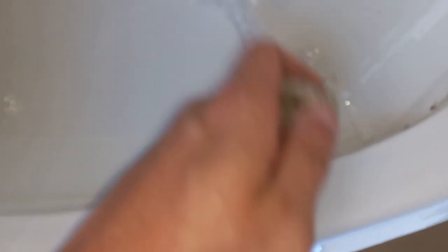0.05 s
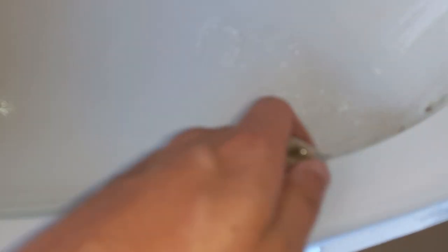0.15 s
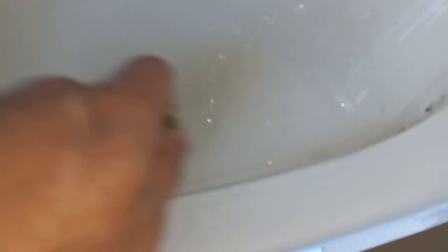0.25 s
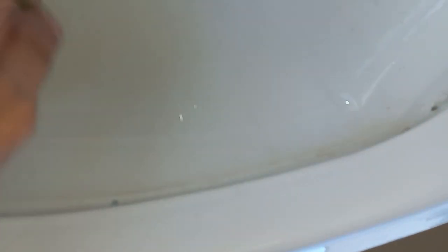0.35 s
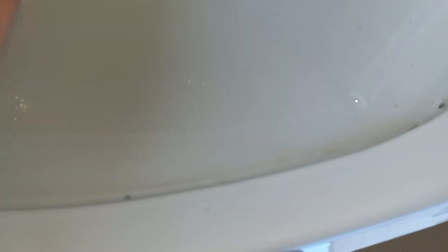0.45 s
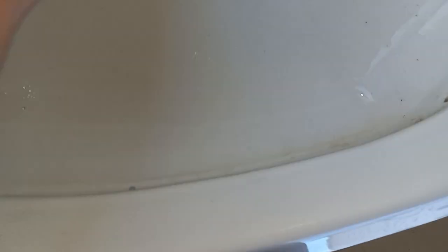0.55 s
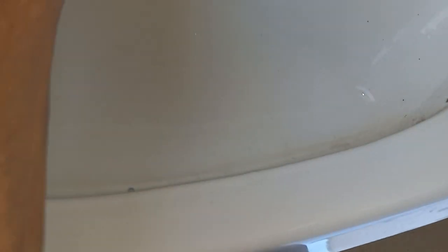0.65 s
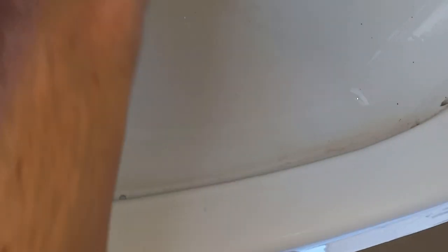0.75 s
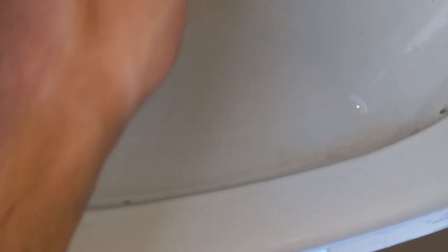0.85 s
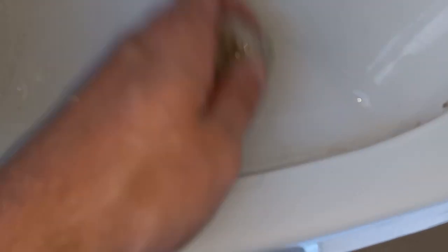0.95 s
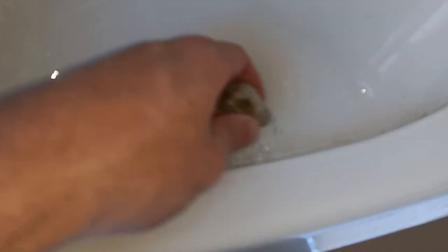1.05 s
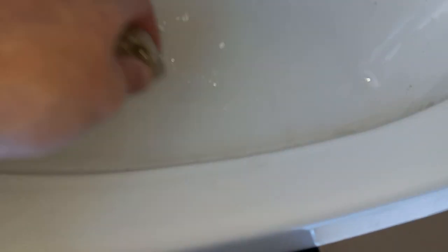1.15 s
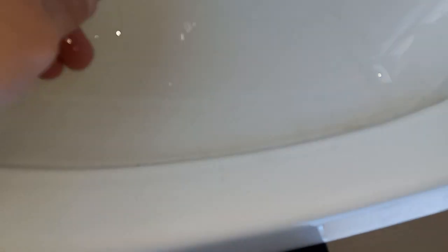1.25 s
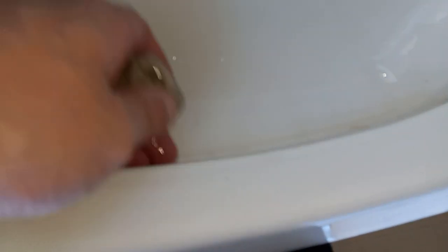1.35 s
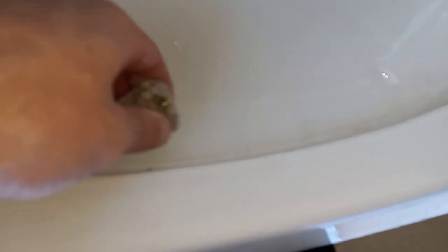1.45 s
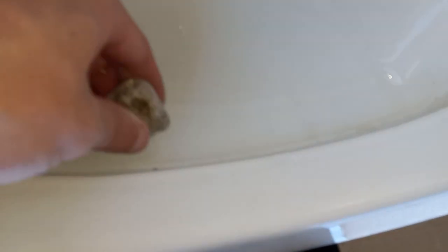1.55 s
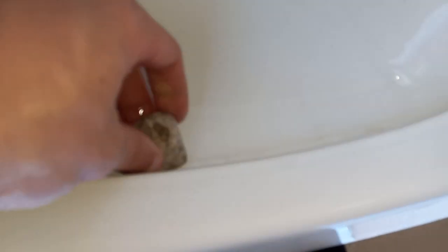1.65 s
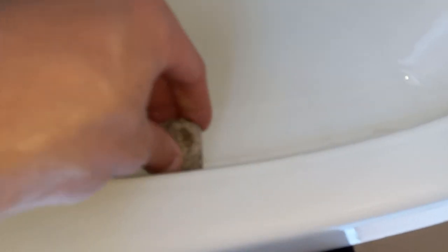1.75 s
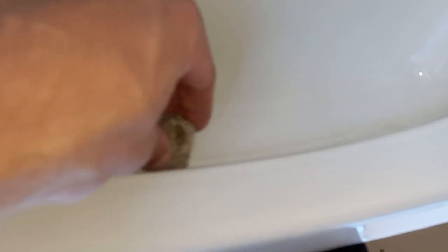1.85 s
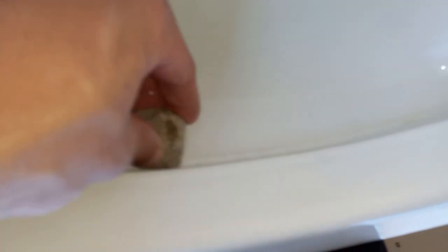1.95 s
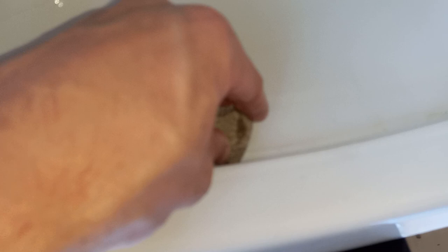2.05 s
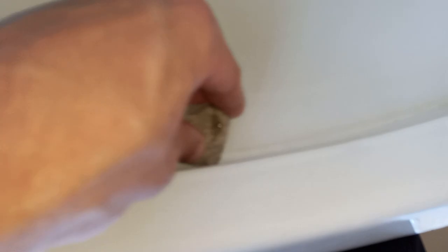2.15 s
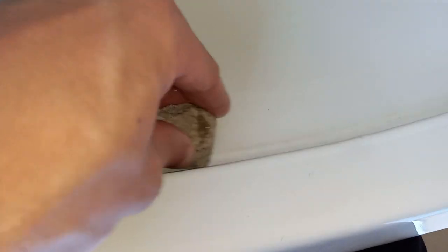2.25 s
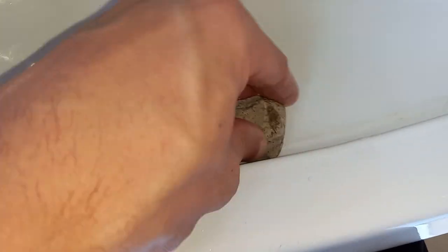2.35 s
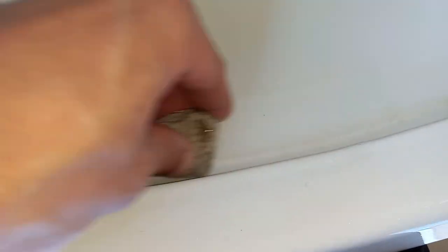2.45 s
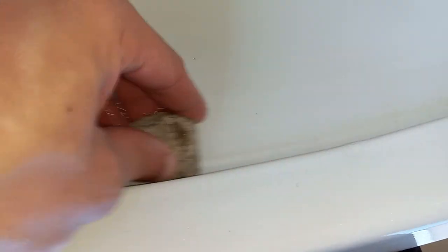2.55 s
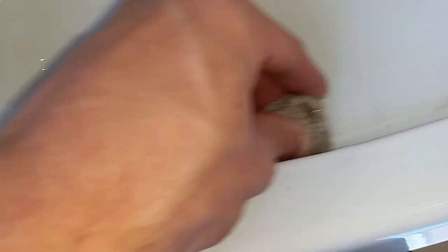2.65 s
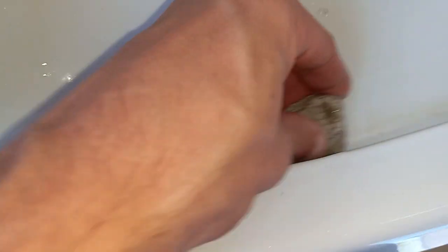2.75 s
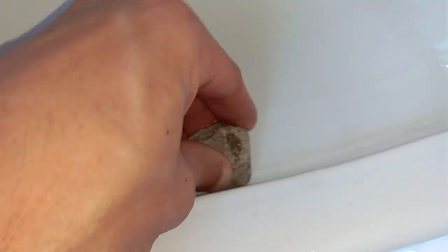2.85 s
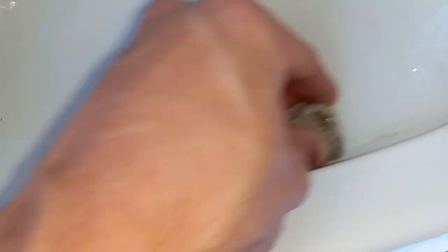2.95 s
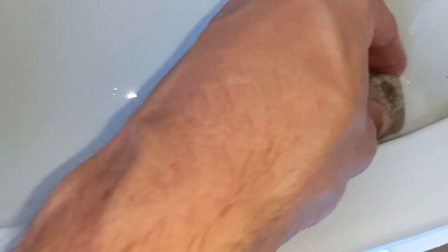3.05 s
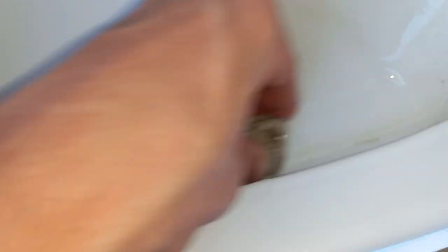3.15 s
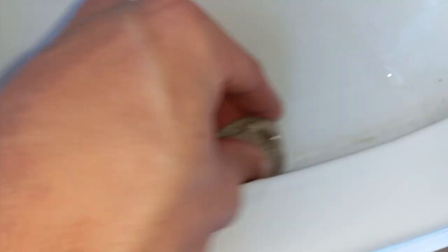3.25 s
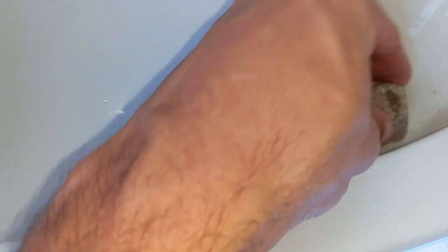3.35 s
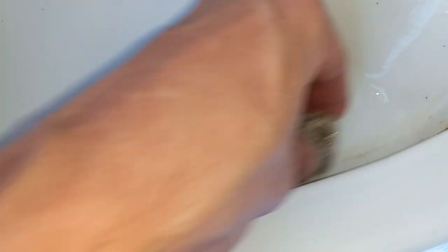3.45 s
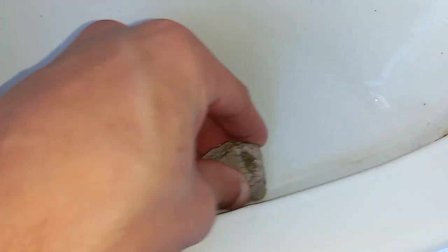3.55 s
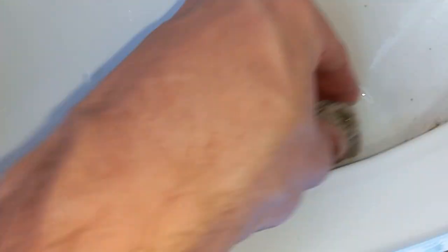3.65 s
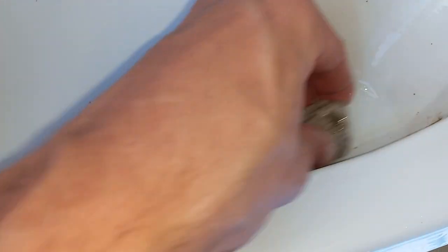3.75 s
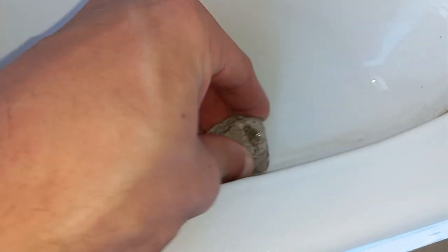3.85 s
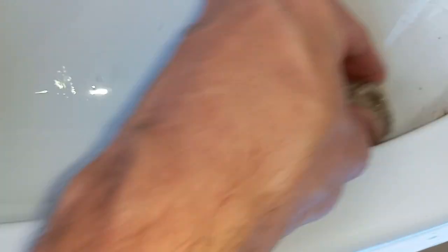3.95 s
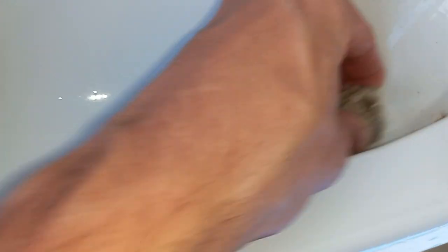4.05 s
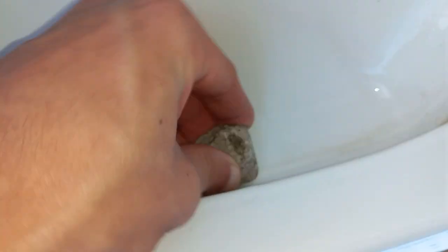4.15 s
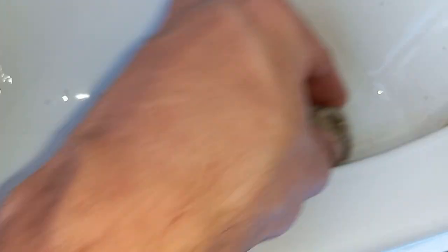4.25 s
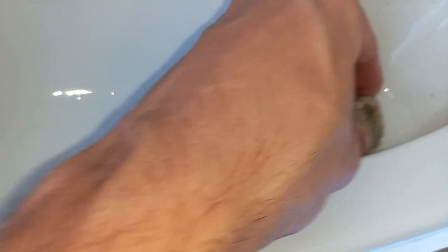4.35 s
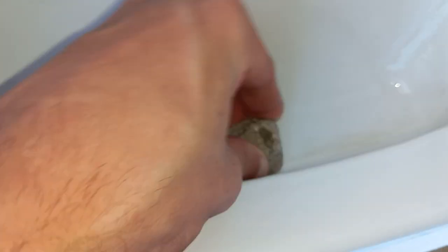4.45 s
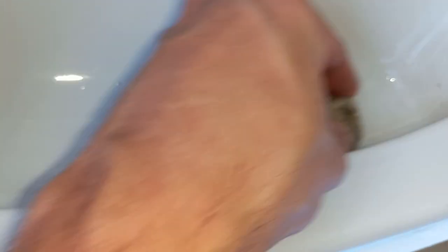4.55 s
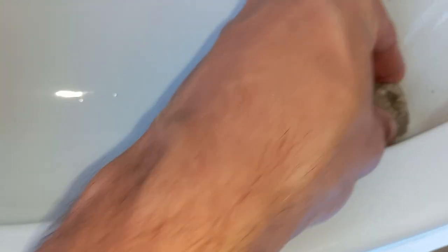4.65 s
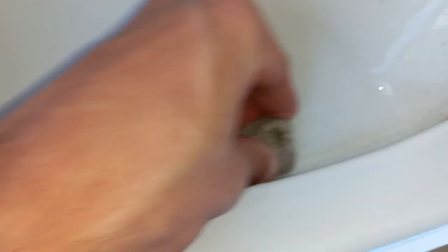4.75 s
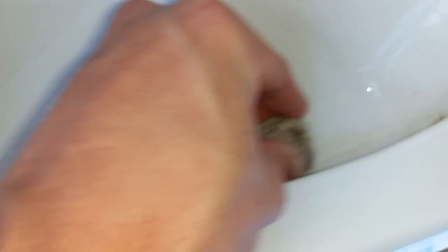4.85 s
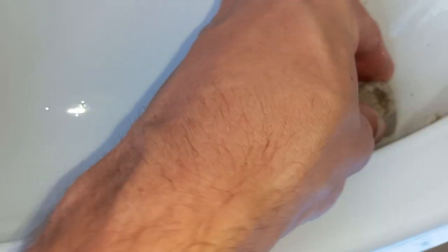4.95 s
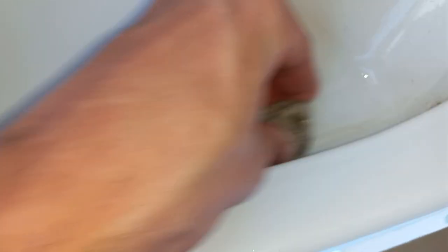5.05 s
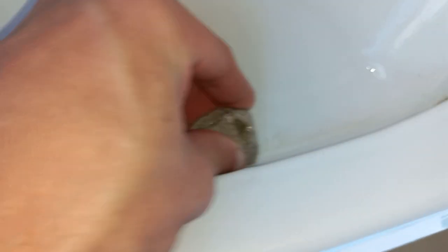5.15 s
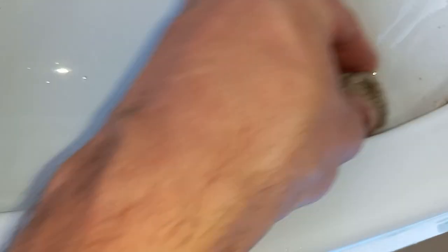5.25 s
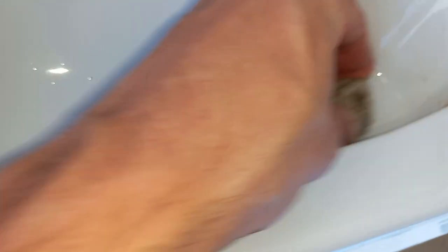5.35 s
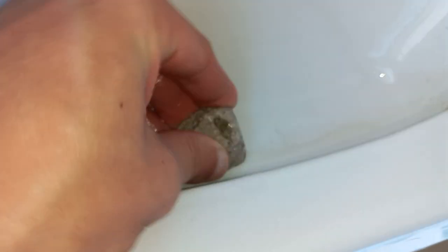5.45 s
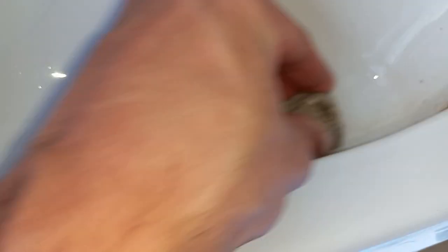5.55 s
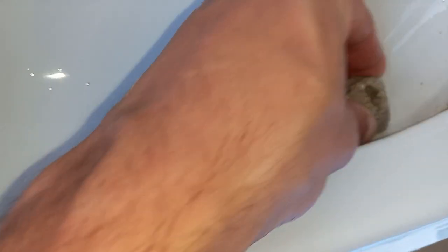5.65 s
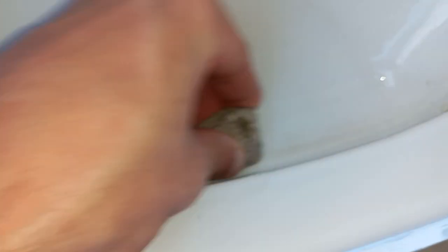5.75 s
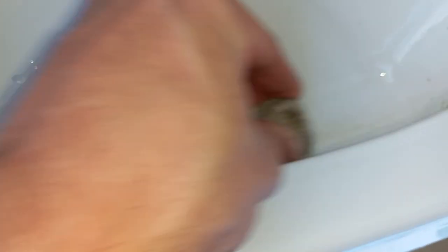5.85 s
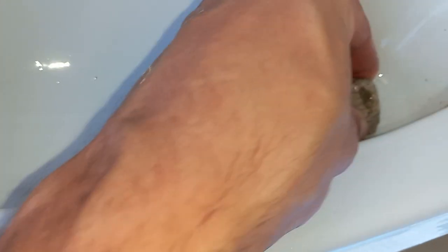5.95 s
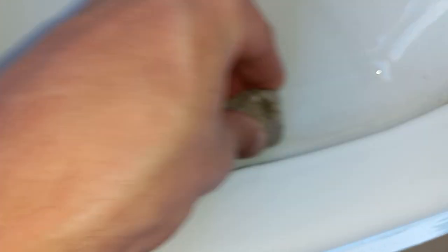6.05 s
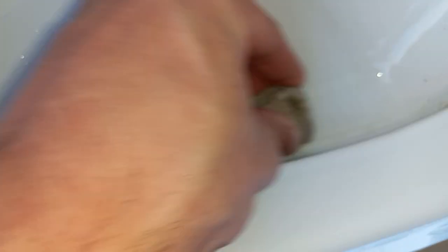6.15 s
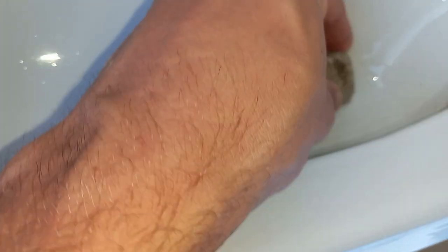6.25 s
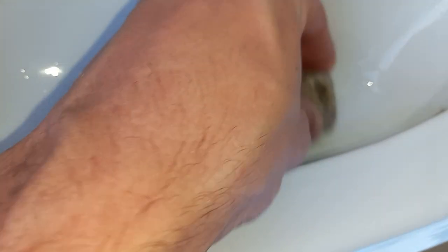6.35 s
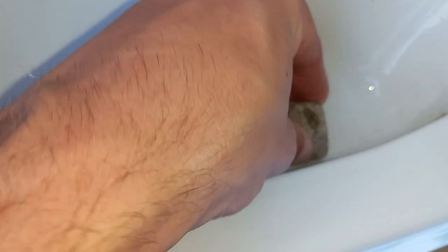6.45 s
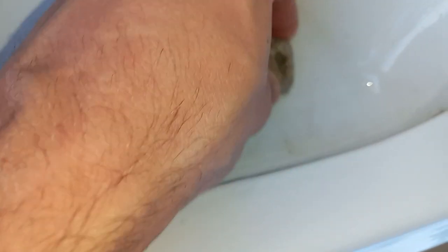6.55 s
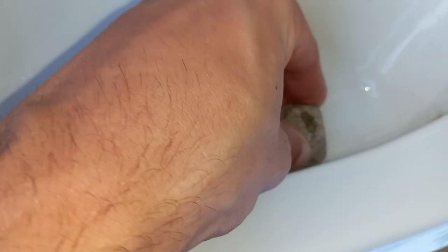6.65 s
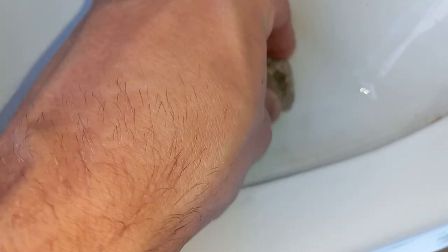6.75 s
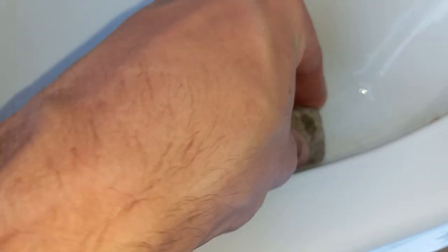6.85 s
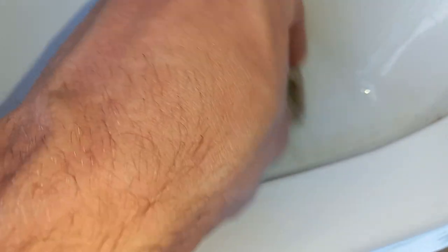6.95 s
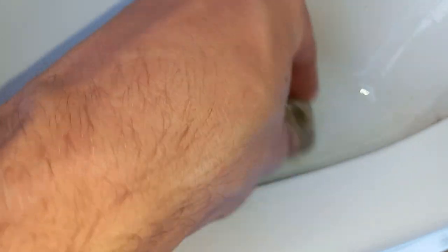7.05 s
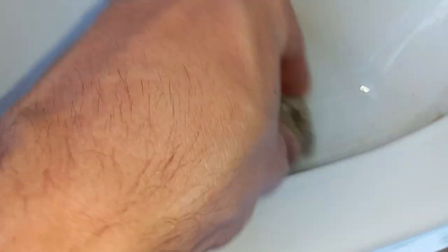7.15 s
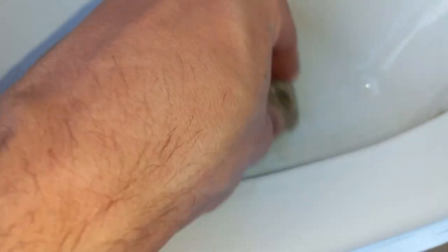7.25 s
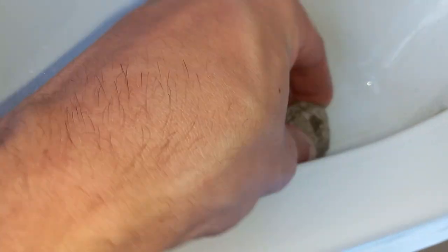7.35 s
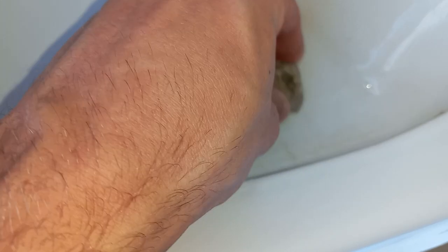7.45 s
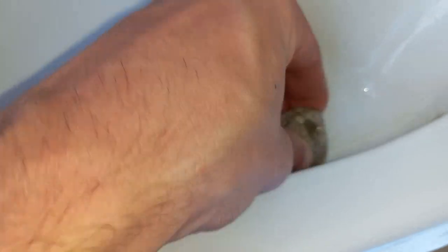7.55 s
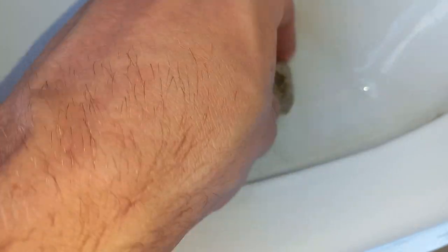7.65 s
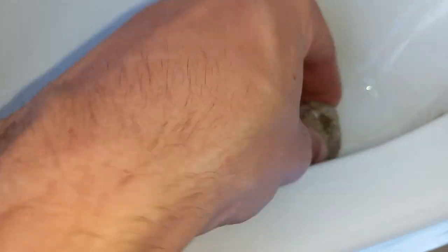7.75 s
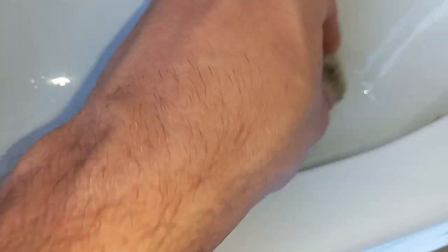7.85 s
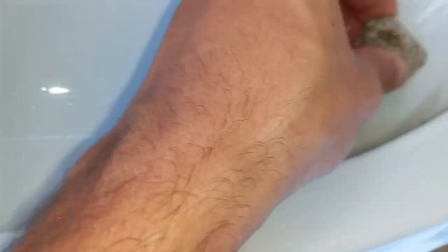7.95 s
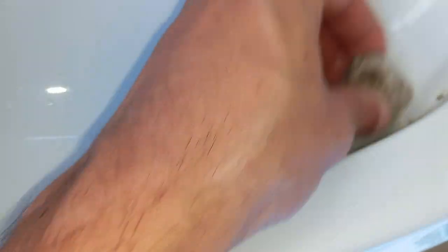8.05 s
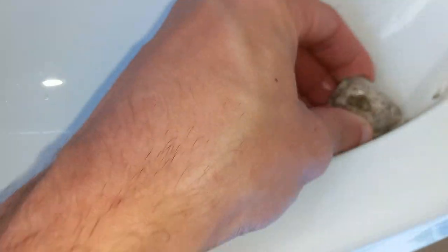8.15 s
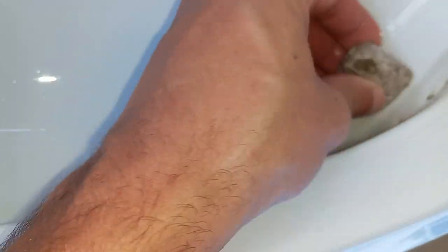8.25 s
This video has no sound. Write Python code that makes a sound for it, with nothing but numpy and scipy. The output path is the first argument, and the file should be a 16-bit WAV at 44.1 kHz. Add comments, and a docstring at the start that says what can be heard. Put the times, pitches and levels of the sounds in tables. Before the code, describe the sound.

Close up at a porcelain basin, a short splash and scattered drops, a low bump, then a denser burst of splashes as a stone is rinsed. It quiets, the stone clacks down, and light gritty rubbing begins. From three seconds the strokes are louder and coarser, with squeaks, cracks and faint porcelain ringing, until they weaken at the end. Small indoor room, stereo microphone very near.

```python
"""Close by a wet porcelain bowl, on a two-port microphone: water trickles and drops splash (bands of noise and pings)
over still air and a low boom, as a pumice stone is rinsed. At about 1.6 s it is set down with a knock.
From 1.8 s it scrubs to and fro along the rim, harder from 3 s: grit crushes at random and squeaks, knocks crack
during the strokes, the porcelain rings in dying sines. Near 8 s the strokes weaken.
Each port hears its own echoes of bowl and room."""
import sys
import numpy as np
from scipy import signal
from scipy.fft import rfft, irfft, next_fast_len
from scipy.io import wavfile

SR = 44100
rng = np.random.default_rng(int(sys.argv[2]) if len(sys.argv) > 2 else 0)


def transcribe(signal):
    """Save signal, clipped to [-1, 1], as a 16-bit WAV file at the path in sys.argv[1]."""
    frames = np.atleast_2d(signal).T
    limited = np.clip(frames, -1, 1)
    pcm = np.round(limited * 32767).astype(np.int16)
    wavfile.write(sys.argv[1], SR, pcm)


N = 365580
BLOCK = 40   # slow curves are worked out at every 40th sample

# still air at the microphone: (frequency [Hz], spectrum [dB])
AIR_SPECTRUM = [(18, -31), (30, -14), (103, 6), (252, -12), (426, -18), (1130, -23.5), (1350, -32.5),
                (8520, -76), (13300, -24), (16000, -53)]
AIR_DB = -58.5   # rms in the dry mix

# weight of the arm on the fixture: (time [s], boom level [dB])
ARM_WEIGHT = [(0.0, -60), (0.34, -46.5), (0.6, -61), (0.81, -34.5), (1.04, -49.5), (1.55, -56), (2.01, -46),
              (2.24, -40.5), (3.09, -49), (4.04, -37.5), (4.34, -46.5), (5.54, -44), (6.72, -59.5),
              (7.73, -57), (7.94, -74), (8.29, -52)]
# the hand bumps the bowl: (time [s], boom level [dB], hollow level [dB])
HAND_BUMPS = [(.005, -30.5, -50.5), (.13, -57, -51), (.53, -42.5, -53), (0.647, -32, -27),
              (0.768, -36, -30), (1.049, -67, -50), (1.3, -51, -46.5), (1.4, -54, -46.5),
              (2.601, -38.5, -33), (4.01, -26, -30), (4.61, -39, -39), (5.229, -38, -34.5)]
BUMP_RISE_S, BUMP_BOOM_DB_PER_S, BUMP_HOLLOW_DB_PER_S = 0.027, 108, 295   # rise, then fades
HOLLOW_REST_DB = -64.5
HOLLOW_LAG_S, HOLLOW_FALL_DB = 0.023, 16   # the hollow answers a swell late; its fall at one time scale

# water trickling before the stone is set down: (time [s], grit-band level [dB], fine hiss level [dB])
WATER_TRICKLE = [(0.0, -31, -39), (0.172, -58.5, -65), (0.526, -64.5, -72), (0.708, -56, -62),
                 (0.844, -55, -75), (0.908, -75, -78), (1.066, -65.5, -63), (1.462, -67, -69.5),
                 (1.63, -88, -79)]
# drops and splashes: (time [s], relative level [dB], centre [Hz], t60 [s], bell drive [dB], left-right [dB])
WATER_DROPS = [(0.021, -20, 3630, 0.027, -48, 24), (0.052, -25, 3430, 0.035, -92, -23),
               (0.119, -15.5, 3670, 0.083, -63, -9), (0.17, -31.5, 5900, 0.064, -91, -4.5),
               (0.209, -38, 3780, 0.15, -83, -9), (0.303, -34.5, 5200, 0.039, -70, 7),
               (0.354, -31, 3170, 0.03, -69, -11), (0.362, -26.5, 4650, 0.13, -82, -12),
               (.376, -31, 7100, 0.024, -75, -5), (0.4, -26.5, 1760, 0.046, -49, -17),
               (0.429, -29.5, 1230, 0.058, -66, 17), (0.451, -34, 4170, .03, -80, -5),
               (0.491, -32, 4350, 0.041, -64, -16), (0.515, -39, 2480, 0.079, -72, -10),
               (.527, -26.5, 2370, .07, -63, -15), (.54, -33, 7500, 0.023, -75, -5),
               (0.657, -16, 4200, 0.11, -69, -7), (0.673, -13, 1200, 0.048, -36, 4),
               (0.736, -7.5, 3560, 0.016, -33, -2), (0.755, -6.5, 2340, 0.088, -34, -7),
               (0.784, -5.5, 1030, 0.022, -45, 6), (.822, -19, 8500, 0.023, -58, 6),
               (0.848, -17.5, 6100, 0.027, -57, -19), (0.895, -16.5, 2440, 0.056, -51.5, -7),
               (.912, -30, 3730, 0.051, -57, 3), (0.959, -30.5, 5140, 0.029, -60, 21),
               (0.993, -28, 4650, 0.03, -62, 0), (1.021, -23, 9300, 0.016, -63, -3),
               (1.037, -12, 1915, 0.039, -85, -5), (1.215, -51, 1870, 0.02, -78, -35),
               (1.238, -39.5, 4000, 0.04, -88, -18), (1.367, -44.5, 2770, 0.28, -74, -14),
               (1.39, -40.5, 4065, 0.15, -60.5, -5), (1.471, -45, 4500, 0.035, -83, -3),
               (1.493, -45.5, 11300, 0.045, -87, -5), (1.613, -40.5, 4860, 0.099, -79, -7)]
PING_DB, PING_SHARE = -4, 0.47   # each drop's clear ping: before the shared drop level; its share of the t60
SPLASH_ON_BOWL_DB = -20   # part of the splash that strikes the porcelain
WASH_DB, WASH_DB_PER_S = -19.5, 502   # water runs off after a splash: re splash, fade
WASH_FINE_DB, FINE_DB_PER_OCTAVE = 10, 4   # its fine hiss re a stroke's; a higher splash hisses more, from 4 kHz

# upper porcelain modes: (frequency [Hz])
PORCELAIN_MODE_HZ = [1698, 2026, 2213, 2365, 2650, 2756, 3050, 3330, 3408, 3779, 4145, 4264, 4465, 4544,
                     4823, 5120, 5384, 5984, 6530, 7065]
# the same modes, row for row: (relative level [dB], t60 [s], left-right [dB], left lead [turns])
PORCELAIN_MODES = [(-13, 0.29, -10, 0.8), (-38, 0.037, 20, 0.59), (-13, 0.16, 5.5, 0.16),
                   (-11, 0.055, -24.5, 0.14), (-19, .3, 8, 0.14), (-13.5, 0.25, -1, 0.35),
                   (-14.5, 0.18, -17.5, 0.79), (-14.5, 0.096, 0, 0.039), (-7.5, 0.2, 1.5, 0.39),
                   (-8.5, 0.022, -20.5, 0.16), (-17, 0.11, -14.5, 0.24), (-8, 0.03, -15.5, 0.22),
                   (-3.5, 0.1, -8.5, 0.67), (-15.5, 0.13, 22.5, 0.34), (-35, 0.085, -20.5, 0.59),
                   (-26.5, 0.11, 1.5, 0.18), (-17.5, 0.14, 14, 0.69), (-39.5, 0.062, 3, .3),
                   (-18.5, 0.1, 17, 1), (-9, 0.11, -21, 0.21)]
# colour of the bowl's echoes at the two ports: (frequency [Hz], left-right [dB])
PORT_BALANCE = [(60, 28), (110, 13), (200, 10), (380, 10), (700, -16), (1290, 4.5), (2380, -13.5),
                (4400, -5), (8120, -2), (15000, -6.5)]
BOWL_T60_S, ROOM_T60_S = 0.026, 0.22
BELL_HZ, BELL_T60_S = 1134.9, 0.47
DRIP_MODE_HZ, DRIP_MODE_DB, DRIP_MODE_T60_S = 766, -7.5, 0.26   # a faint mode that drops strike, re bell drive
RATTLE_HZ, RATTLE_DB, RATTLE_T60_S = 666, -37, 0.051   # a dull mode that the grit shakes

# the fixture jolts on its mount: (time [s], push level [dB])
MOUNT_JOLTS = [(.66, -37), (4.04, -34), (4.66, -31), (5.62, -34), (6.412, -27), (6.644, -37), (6.84, -35),
               (7.025, -45), (7.21, -54), (7.57, -39), (7.746, -26.5), (8.105, -54)]
JOLT_HZ, JOLT_T60_S, JOLT_PUSH_S = 62, 0.098, 0.0041

# stone knocks on porcelain: (time [s], relative level [dB], centre [Hz], t60 [s], bell drive [dB], thud drive [dB])
STONE_KNOCKS = [(1.6462, -17, 2790, 0.014, -21.5, -29.5), (1.999, -31, 3050, 0.014, -46, -30.5),
                (2.057, -30, 3040, 0.14, -61.5, -57), (2.423, -44.5, 3090, 0.018, -73, -53),
                (2.5876, -32.5, 2950, 0.018, -49.5, -42), (2.8106, -22.5, 2940, 0.026, -72, -38.5),
                (3.1627, -17, 3200, 0.06, -60, -38.5), (3.3157, -16.5, 4400, 0.012, -35.5, -38),
                (3.4385, -29, 3930, 0.024, -64, -39), (3.5846, -25, 4480, 0.021, -84, -70),
                (3.8908, -27, 2400, 0.028, -51, -46), (3.9316, -27, 2460, 0.045, -39, -47),
                (4.1083, -14.5, 2120, 0.011, -37.5, -29.5), (4.298, -9.5, 2060, 0.013, -27, -29.5),
                (4.6027, -7.5, 2320, 0.0043, -41, -30), (5.101, -22, 4030, 0.084, -88, -45),
                (5.3424, -29, 2340, 0.018, -41, -36), (5.6065, -24.5, 2230, 0.014, -41.5, -60),
                (5.675, -25, 3400, 0.02, -54, -35), (5.875, -22, 4250, 0.02, -68, -33),
                (6.0224, -19, 4260, 0.03, -51, -56), (6.1942, -16.5, 3280, 0.024, -38, -54),
                (6.2727, -20, 3650, 0.02, -100, -42), (6.4078, -5.5, 4800, 0.0075, -61, -25),
                (6.469, -11.5, 3550, 0.006, -65, -32), (6.6369, -11, 4100, 0.081, -43, -28),
                (6.7118, -21.5, 3440, 0.015, -52.5, -68), (6.8349, -7.5, 4160, 0.0075, -41, -32),
                (7.018, -9.5, 4170, 0.0047, -53, -25), (7.1988, -9.5, 2460, 0.0082, -38, -29),
                (7.263, -25, 4200, 0.029, -71, -43), (7.3725, -10, 2250, 0.027, -38.5, -26.5),
                (7.426, -21.5, 2490, 0.034, -43.5, -32.5), (7.5612, -9.5, 2630, 0.047, -42, -29.5),
                (7.634, -26, 4200, 0.015, -47, -51), (7.7424, -3, 4300, 0.0055, -34.5, -26),
                (7.9974, -28, 2130, 0.013, -37.5, -63), (8.097, -11.5, 2250, 0.0097, -36.5, -32),
                (8.2147, -31.5, 2330, 0.029, -46, -69), (8.2476, -28.5, 2280, 0.014, -43, -51)]
TICK_DB, TICK_T60_S = -23.5, 0.0056   # bright edge of a knock re its level; decay
SKID_DB, SKID_DB_PER_S, SKID_FINE_DB = -12, 459, -17   # skid after a knock: re knock, fade, hiss re a stroke's
LOW_DB_PER_KHZ = -3.5   # a higher knock or splash leaves less to the low edge

# one row for each swell of grit, one or more to a stroke: (top [s], rise scale [s], fall scale [s],
# grit level [dB], low edge of the stone re grit [dB], squeak [Hz], hollow level [dB])
GRIT_SWELLS = [(1.799, 0.039, 0.017, -31.5, -9, 4350, -51.5), (1.892, 0.1, 0.065, -38.5, -4, 3880, -74),
               (2.01, 0.047, 0.059, -38, -2.5, 3010, -46), (2.068, 0.088, 0.057, -40.5, -1.5, 3270, -54),
               (2.21, 0.1, 0.024, -41, -18, 3560, -54), (2.272, 0.032, 0.03, -39.5, -13, 3090, -47),
               (2.351, 0.1, 0.06, -34.5, -1.5, 3050, -48.5), (2.46, 0.099, 0.14, -39, -29, 3250, -60),
               (2.63, 0.14, 0.17, -36, -1, 3220, -48), (2.815, 0.052, 0.096, -38, -17, 3140, -49.5),
               (3.002, 0.099, 0.082, -26.5, -3, 3960, -44.5), (3.049, 0.019, 0.021, -19, -3.5, 3750, -38),
               (3.169, 0.12, 0.082, -26, -7.5, 2240, -48), (3.348, 0.074, 0.048, -20.5, -4.5, 2140, -37),
               (3.498, 0.096, 0.04, -21, -8.5, 3840, -44.5), (3.646, 0.064, 0.093, -23, -3, 2550, -40),
               (3.827, 0.18, 0.034, -28, -5.5, 4200, -46), (3.98, 0.083, 0.052, -20, -4, 2520, -39),
               (4.07, 0.031, 0.084, -31.5, -1.5, 4300, -35.5),
               (4.138, 0.08, 0.031, -24.0, -27, 4330, -41.5), (4.29, 0.11, 0.11, -25, -4.5, 2300, -45),
               (4.42, 0.093, 0.24, -31.5, -7.5, 4460, -48.5), (4.588, 0.08, 0.069, -22.5, -3, 2380, -39.5),
               (4.78, 0.16, 0.093, -28.0, -8.5, 4460, -48), (4.926, 0.086, 0.1, -24.5, -4.5, 2520, -43.5),
               (5.115, 0.16, 0.091, -25.5, -12, 4000, -43), (5.281, 0.1, 0.031, -22, -3.5, 2520, -41.5),
               (5.389, 0.083, 0.12, -26.5, -8.5, 4370, -44.5), (5.571, 0.095, 0.12, -26, -4.5, 4740, -45),
               (5.743, 0.1, 0.077, -24.5, -8.5, 4100, -43.5), (5.892, 0.069, 0.15, -28, -6, 4460, -43.5),
               (6.074, 0.079, 0.067, -23, -7.5, 3630, -45.5), (6.192, 0.027, 0.056, -23.5, -6, 3420, -42.5),
               (6.288, 0.1, 0.031, -39.5, -59, 3900, -52), (6.392, 0.045, 0.036, -30.5, -5.5, 3600, -39.5),
               (6.508, 0.099, 0.044, -28, -12, 4070, -46.5), (6.623, 0.039, 0.048, -25, -9, 2310, -35.5),
               (6.723, 0.037, 0.028, -23.5, -20, 4090, -49.5),
               (6.813, 0.032, 0.061, -28.5, -6.5, 2500, -34.5),
               (6.923, 0.11, 0.033, -31.5, -6.5, 3700, -55), (6.988, 0.025, 0.075, -30.5, -2, 2280, -33.5),
               (7.111, 0.094, 0.066, -31, -11, 3770, -56), (7.18, 0.021, 0.052, -31.5, -4.5, 2460, -33.5),
               (7.279, 0.092, 0.059, -32.0, -9.5, 4100, -54), (7.357, 0.016, 0.039, -29, -5.5, 2500, -32),
               (7.457, 0.028, 0.038, -29.0, -17, 2510, -50.5), (7.54, 0.032, 0.072, -33.5, -4.5, 2460, -41),
               (7.643, 0.1, 0.026, -31, -8.5, 4090, -58), (7.72, 0.032, 0.094, -34.5, -6, 2350, -43),
               (7.822, 0.072, 0.039, -36.5, -3.0, 2840, -69.5),
               (8.08, 0.018, 0.066, -41.5, 0.5, 2460, -40.5), (8.224, 0.014, 0.0087, -49, 15, 2280, -51),
               (8.26, 0.041, 0.092, -41, 2, 2330, -62)]
# how the stone lies: (time [s], dull rasp re grit [dB], squeak re grit [dB], squeak width [Hz],
# fine hiss re grit [dB])
STONE_LIE = [(0, -21.5, -5.5, 494, -3.5), (.6, -7.5, -11, 500, -17.5), (1.2, -24.5, 1, 500, -9.5),
             (1.7, -26.5, -27.5, 402, -18), (2.05, -10.5, 0.5, 150, -13.5), (2.4, -10.5, 3, 295, -11),
             (2.85, -10.5, 0.5, 336, -11), (3.1, -20.5, -20, 447, -15.5), (4.5, -18.5, -28, 450, -15.5),
             (5.2, -20, -34, 454, -15.5), (6.3, -16, -3, 466, -11.5), (6.6, -31.5, -30, 400, -17),
             (7.2, -30, -16, 388, -16), (7.8, -20, 1.5, 400, -11.5), (8.05, -16, -17, 299, -4.5),
             (8.29, -24.5, -28, 300, -11.5)]
# colour of the crushed grit before it is split in bands: (frequency [Hz], gain [dB])
GRIT_SPECTRUM = [(260, -59), (450, -19.5), (674, -13), (922, -16), (1120, -12), (1210, -8.5), (1580, -11.5),
                 (1730, -7.5), (2130, -6), (2290, -2.5), (2910, -11), (3700, -5), (4500, -4.5),
                 (5300, -12.5), (5970, -16), (12400, -21.5), (16000, -29.5)]
GRIT_FALL_DB, FINE_FALL_DB = 14.5, 15   # fall at one time scale from the top of a swell: grit, fine hiss
ROUNDNESS = 1.457   # exponent that shapes the swell
# brief changes of the grit level, mostly dips at turns: (time [s], loss, negative is a gain [dB])
GRIT_DIPS = [(1.955, 0), (2.24, -2), (2.405, 5), (2.548, 13), (2.878, 5), (3.091, 10), (3.239, 10),
             (3.417, 21), (3.564, -1), (3.746, 13), (3.875, 3), (4.03, 10), (4.192, -3), (4.354, 19),
             (4.5, 8), (4.996, 21), (5.161, 7), (5.33, 7), (5.49, -3), (5.66, 25), (5.82, -3), (5.973, 23),
             (6.128, 20)]
DIP_S = 0.0065   # Gaussian spread of a change

CUTOFF_HZ = 16600   # 60 dB down from here up


def from_db(db):
    """Decibels to gain."""
    return 10 ** (np.asarray(db) / 20)


def rms_one(x):
    """Scale to rms 1."""
    return x / np.sqrt(np.mean(x ** 2) + 1e-20)


def in_time(table):
    """Join a table's points by straight lines, one value per sample for each column."""
    s, *columns = np.transpose(table)
    return [np.interp(np.arange(N) / SR, s, column) for column in columns]


def at_hz(points, hz):
    """Read a spectrum on a log-frequency axis."""
    points = np.array(points)
    return np.interp(np.log(hz + 1), np.log(points[:, 0] + 1), points[:, 1])


def shaped(x, gain_db_at):
    """Filter by a gain in dB given as a function of frequency."""
    size = next_fast_len(N)
    hz = np.arange(size // 2 + 1) * SR / size
    return irfft(rfft(x, size) * from_db(gain_db_at(hz)), size)[..., :N]


def drift(corner_hz):
    """Slow chance, spread 1: white noise through two equal poles."""
    r = np.exp(-2 * np.pi * corner_hz * BLOCK / SR)
    noise = rng.standard_normal(N // BLOCK + 2002)
    slow = signal.lfilter([1], [1, -2 * r, r * r], noise)[2000:]   # the filter has settled
    return np.interp(np.arange(N) / BLOCK, np.arange(len(slow)), rms_one(slow))


def ring(force, hz, t60, lead=0):
    """A unit click sets a sine of height 1 ringing; lead is its starting phase in turns."""
    r, w, p = from_db(-60 / (t60 * SR)), 2 * np.pi * hz / SR, 2 * np.pi * lead
    return signal.lfilter([np.sin(p), r * np.sin(w - p)], [1, -2 * r * np.cos(w), r * r], force + 1e-18)


def clicks(times, levels_db):
    """Single samples at given times."""
    out = np.zeros(N)
    out[np.minimum((np.array(times) * SR).astype(int), N - 1)] = from_db(levels_db)
    return out


def add(out, s, piece):
    """Mix a short piece in at time s."""
    at = int(s * SR)
    out[..., at:at + piece.shape[-1]] += piece[..., :N - at]


def filtered(x, order, edge_hz, kind):
    """Butterworth filter."""
    return signal.sosfilt(signal.butter(order, edge_hz, kind, fs=SR, output="sos"), x)


def burst(hz, spread, t60):
    """Dying noise in a band around hz that opens with a click, peak 1."""
    t = np.arange(6000) / SR
    noise = rng.standard_normal(6000) * from_db(-60 * t / max(t60, .005))
    noise[0] = 3.04
    edges = np.clip([hz / spread, hz * spread], 100, 19000)
    x = filtered(noise, 2, edges, "band")
    return x / np.abs(x).max()


def swells(fall_db, lag_s):
    """Power of every swell, top 1, at every 40th sample: the rubbing grows and dies away."""
    s, up_s, down_s = np.array(GRIT_SWELLS)[:, :3].T[:, :, None]
    t = np.arange(0, N + BLOCK, BLOCK) / SR - s - lag_s
    from_top = np.where(t < 0, -t / np.maximum(up_s, .005), t / np.maximum(down_s, .005))
    return from_db(-2 * fall_db * from_top ** ROUNDNESS)


def fades(times, db_per_s, rise_s):
    """Power around every event, top 1, at every 40th sample: a quick rise up to it, a steady fade."""
    t = np.arange(0, N + BLOCK, BLOCK) / SR - np.array(times)[:, None]
    return np.clip(1 + t / rise_s, 0, 1) ** 2 * from_db(-2 * db_per_s * np.clip(t, 0, 1))


def summed(levels_db, shapes):
    """Add the powers of the shapes at their levels; one value per sample."""
    power = from_db(2 * np.asarray(levels_db)) @ shapes
    return np.interp(np.arange(N) / BLOCK, np.arange(shapes.shape[1]), power)


def still_air():
    """Steady noise, independent at each port, shaped like the air of the place."""
    air = shaped(rng.standard_normal((2, N)), lambda hz: at_hz(AIR_SPECTRUM, hz))
    return from_db(AIR_DB) * rms_one(air)


def boom():
    """Pushes of the hand shake the fixture near 100 Hz and the hollow of the bowl near 280 Hz."""
    s, boom_db, hollow_db = np.transpose(HAND_BUMPS)
    lean_power = from_db(2 * in_time(ARM_WEIGHT)[0])
    lean = np.sqrt(lean_power + summed(boom_db, fades(s, BUMP_BOOM_DB_PER_S, BUMP_RISE_S)))
    swell_power = summed(np.array(GRIT_SWELLS)[:, 6], swells(HOLLOW_FALL_DB, HOLLOW_LAG_S))
    bump_power = summed(hollow_db, fades(s, BUMP_HOLLOW_DB_PER_S, BUMP_RISE_S))
    press = np.sqrt(swell_power + from_db(2 * HOLLOW_REST_DB) + bump_power)

    shared, left, right = rng.standard_normal((3, N))
    push = shared + np.array([left, right])
    fixture = rms_one(ring(push, 105.8, 0.26) + 0.33 * ring(push, 98, 0.48) + 0.26 * ring(push, 157, 0.19))
    push = shared + 0.25 * np.array([left, right])   # the hollow is more alike at the two ports
    hollow_modes = ring(push, 276.0, 0.059) + 0.53 * ring(push, 330.5, 0.029)
    hollow = rms_one(ring(hollow_modes, 310, 0.019))

    s, thud_db = np.array(STONE_KNOCKS)[:, [0, 5]].T
    thuds = ring(clicks(s, thud_db - 2), 272.7, 0.12) + ring(clicks(s, thud_db - 17.5), 88.5, 0.34)
    return lean * fixture + (press * hollow + thuds) * from_db([[.8], [-.8]])


def contact_levels():
    """Gains of all grit, its low edge and its fine hiss: powers of swells, skids, run-off and trickle add."""
    swell, knock, splash = np.array(GRIT_SWELLS), np.array(STONE_KNOCKS), np.array(WATER_DROPS)
    skids = fades(knock[:, 0], SKID_DB_PER_S, 0.0034)
    washes = fades(splash[:, 0], WASH_DB_PER_S, 0.0017)
    shapes = np.concatenate([swells(GRIT_FALL_DB, 0), skids, washes])
    fine_shapes = np.concatenate([swells(FINE_FALL_DB, 0), skids, washes])

    grit_db = np.concatenate([swell[:, 3], knock[:, 1] + SKID_DB, splash[:, 1] + WASH_DB])
    pitch_hz = np.concatenate([knock[:, 2], splash[:, 2]])
    event_low_db = LOW_DB_PER_KHZ * np.clip(pitch_hz - 2100, 0, 3000) / 1000
    low_db = np.concatenate([swell[:, 4], event_low_db])
    wash_fine_db = WASH_FINE_DB + FINE_DB_PER_OCTAVE * np.log2(splash[:, 2] / 4000)
    fine_db = np.concatenate([np.zeros(len(swell)), np.full(len(knock), SKID_FINE_DB), wash_fine_db])

    trickle, trickle_fine = from_db(2 * np.array(in_time(WATER_TRICKLE)))
    hiss_share = from_db(2 * in_time(STONE_LIE)[3])
    whole_power = summed(grit_db, shapes) + trickle
    low_power = summed(grit_db + low_db, shapes) + .3 * trickle
    fine_power = hiss_share * summed(grit_db + fine_db, fine_shapes) + trickle_fine
    return dips() * np.sqrt([whole_power, low_power, fine_power])


def moving_resonance(x, hz, width_hz):
    """A resonance whose centre and width move in blocks of 256 samples; even loudness at any width."""
    state, out = np.zeros(2), np.zeros(N)
    for i in range(0, N, 256):
        r = np.exp(-np.pi * max(width_hz[i], 30) / SR)
        b = np.sqrt(1 - r * r) * np.array([1, 0, -1])
        a = [1, -2 * r * np.cos(2 * np.pi * hz[i] / SR), r * r]
        out[i:i + 256], state = signal.lfilter(b, a, x[i:i + 256], zi=state)
    return out


def grit():
    """Grains crush at random in clumps; the contact shifts among rasp, low, middle, fine grain and a squeak."""
    whole, edge_gain, hiss = contact_levels()
    rasp_db, squeak_db, width_hz = in_time(STONE_LIE)[:3]
    sizes = from_db(3.62 * np.minimum(rng.exponential(1, N), 5)) * rng.choice([-1, 1], N)
    crushed = rng.random(N) < 6000 * from_db(3 * drift(40)) / SR   # about 6000 grains a second, in clumps
    grains = sizes * crushed + .5 * rng.standard_normal(N)
    body = shaped(grains * from_db(1.65 * drift(34)), lambda hz: at_hz(GRIT_SPECTRUM, hz))

    def band(edge_hz, kind, flicker_db):
        """One band of the body, flickering by itself."""
        return rms_one(filtered(body, 3, edge_hz, kind)) * from_db(flicker_db * drift(39.7))

    rasp = band(1550, "low", 3.2)
    low = band([1620, 2900], "band", 3.0)
    middle = band([2900, 6300], "band", 1.8)
    fine = band(6300, "high", 1.6)

    rows = np.array(GRIT_SWELLS)   # the squeak keeps its pitch through a swell
    changes_s = rows[1:, 0] - rows[1:, 1]
    squeak_hz = rows[np.searchsorted(changes_s, np.arange(N) / SR), 5]
    squeak = rms_one(moving_resonance(grains, squeak_hz, width_hz))
    squeak = squeak * from_db(3.94 * drift(25))   # it catches and lets go

    # what the low edge leaves to the middle
    rest = np.sqrt(np.clip(whole ** 2 - edge_gain ** 2, 0.025 * whole ** 2, None))
    scrape = whole * (from_db(rasp_db) * rasp + from_db(squeak_db) * squeak)
    return from_db(-2) * (scrape + edge_gain * low + rest * middle + from_db(3.5) * hiss * fine)


def splashes():
    """Short wet noises, each with its own pitch, side and ping, over a fainter broad spit."""
    out = np.zeros((2, N))
    t = np.arange(6000) / SR
    for s, db, hz, t60, bell_db, pan_db in WATER_DROPS:
        spit = burst(7000, 2.5, .4 * t60)
        ping = np.sin(2 * np.pi * hz * t) * from_db(PING_DB - 60 * t / (PING_SHARE * t60))
        wet = burst(hz, 1.27, t60) + .3 * spit + ping
        add(out, s, from_db(db - 12.5 + np.array([[.5], [-.5]]) * pan_db) * wet)
    return out


def echo_cloud(t60, wet_db):
    """Direct sound plus a dense dying cloud of echoes, another one at each port."""
    tail = rng.standard_normal((2, 16000)) * from_db(-60 * np.arange(16000) / SR / t60)
    tail *= from_db(wet_db) / np.sqrt(np.sum(tail ** 2, axis=1, keepdims=True))
    tail[:, 0] = 1
    return tail


def echoes(x, response):
    """Pass a sound through a two-port impulse response."""
    return signal.oaconvolve(x * np.ones((2, 1)), response, axes=1)[:, :N]


def porcelain(level_db):
    """Upper modes after a unit tap, own level and phase at each port; every place strikes them differently."""
    t = np.arange(16000) / SR
    out = np.zeros((2, 16000))
    for hz, (db, t60, pan_db, lead) in zip(PORCELAIN_MODE_HZ, PORCELAIN_MODES):
        struck_db = 1.5 * rng.standard_normal()
        gain = from_db(level_db + db + struck_db - 60 * t / t60)
        out[0] += gain * from_db(pan_db / 2) * np.sin(2 * np.pi * (hz * t + lead))
        out[1] += gain * from_db(-pan_db / 2) * np.sin(2 * np.pi * hz * t)
    return out


def bowl(scrub, blows):
    """The stone travels among three places with their own echoes and ring; blows at the rim arrive drier."""
    place = 2.53 * drift(8.13)
    shares = [np.sqrt(2 / 3) * np.cos(place + 2 * np.pi * k / 3) for k in range(3)]
    hz = np.arange(8001) * SR / 16000
    ports = from_db(np.array([[.5], [-.5]]) * at_hz(PORT_BALANCE, hz))
    # (force, echoes re direct [dB], near sound [dB], porcelain ring [dB])
    paths = [(scrub * share, 5, -6, -32) for share in shares] + [(blows, -1.5, -2.5, -28)]
    out = 0
    for force, wet_db, level_db, ring_db in paths:
        near = irfft(rfft(echo_cloud(BOWL_T60_S, wet_db)) * ports) * from_db(level_db)
        near[:, 8000:] = 0   # nothing sounds ahead of the contact
        out = out + echoes(force, near + porcelain(ring_db))
    return out


def bell(scrub):
    """The lowest clear mode: struck by knocks and drops, kept humming by the grit."""
    hits = np.concatenate([np.array(STONE_KNOCKS)[:, [0, 4]], np.array(WATER_DROPS)[:, [0, 4]]])
    force = clicks(hits[:, 0], hits[:, 1] + 3) + from_db(-38) * scrub
    return np.array([ring(force, BELL_HZ, BELL_T60_S, 0.29), ring(force, BELL_HZ, BELL_T60_S)])


def undertones(scrub):
    """Two fainter modes under the bell, heard in opposite phase at the two ports."""
    s, bell_db = np.array(WATER_DROPS)[:, [0, 4]].T
    drip = ring(clicks(s, bell_db + DRIP_MODE_DB), DRIP_MODE_HZ, DRIP_MODE_T60_S)
    rattle = from_db(RATTLE_DB) * ring(scrub, RATTLE_HZ, RATTLE_T60_S)
    return (drip + rattle) * np.array([[.4], [-1]])


def jolts():
    """A soft push sets the whole fixture swinging for a few cycles."""
    s, db = np.transpose(MOUNT_JOLTS)
    push = np.hanning(int(JOLT_PUSH_S * SR) + 3)
    pushes = signal.oaconvolve(clicks(s, db), push / push.sum())[:N]
    return ring(pushes, JOLT_HZ, JOLT_T60_S)


def knocks():
    """A sharp broad crack, a short crunch at the knock's own pitch and a bright tick."""
    out = np.zeros(N)
    for s, db, hz, t60, bell_db, thud_db in STONE_KNOCKS:
        crack = 1.04 * burst(3190, 1.405, 0.13 * t60)
        crunch = 0.55 * burst(hz, 1.139, t60)
        tick = from_db(TICK_DB) * burst(10000, 2.2, TICK_T60_S)
        add(out, s, from_db(db) * (crack + crunch + tick))
    return out


def dips():
    """Brief changes of the grit level, mostly dips at turns, as a gain."""
    s, lost_db = np.transpose(GRIT_DIPS)[:, :, None]
    t = np.arange(0, N + BLOCK, BLOCK) / SR
    gain_db = -np.sum(lost_db * np.exp(-.5 * ((t - s) / DIP_S) ** 2), axis=0)
    return from_db(np.interp(np.arange(N) / SR, t, gain_db))


def scene():
    """Contact sounds echo in the bowl and the room, over the low boom and still air."""
    scrub = grit()
    water = splashes()
    blows = knocks() + from_db(SPLASH_ON_BOWL_DB) * water.sum(axis=0)
    contact = bowl(scrub, blows) + water
    in_room = echoes(contact, echo_cloud(ROOM_T60_S, wet_db=-10))
    return in_room + bell(scrub) + undertones(scrub) + boom() + jolts() + still_air()


def record(dry):
    """The microphone loses the deepest bass, peaks are rounded, the top is cut."""
    thin = filtered(dry, 4, 46, "high")
    rounded = 1.282 * np.tanh(thin / 1.323)
    return signal.sosfilt(signal.cheby2(12, 60, CUTOFF_HZ, fs=SR, output="sos"), rounded)


dry = scene()
out = record(dry)
transcribe(out)
```